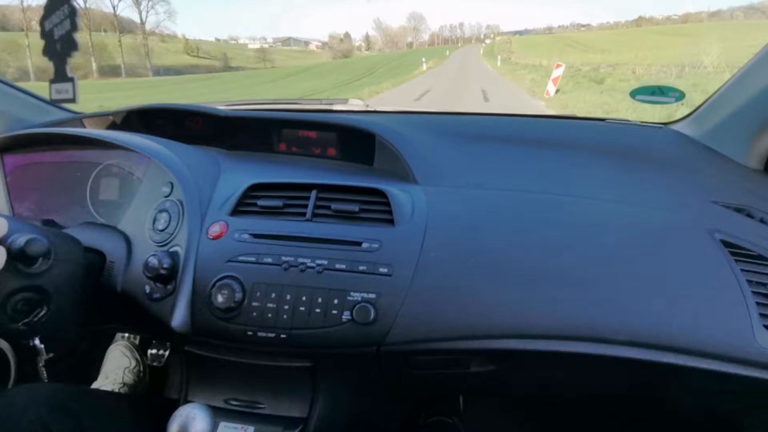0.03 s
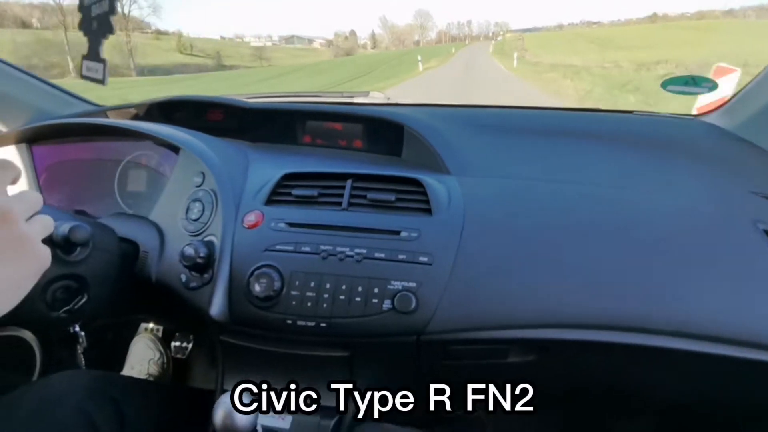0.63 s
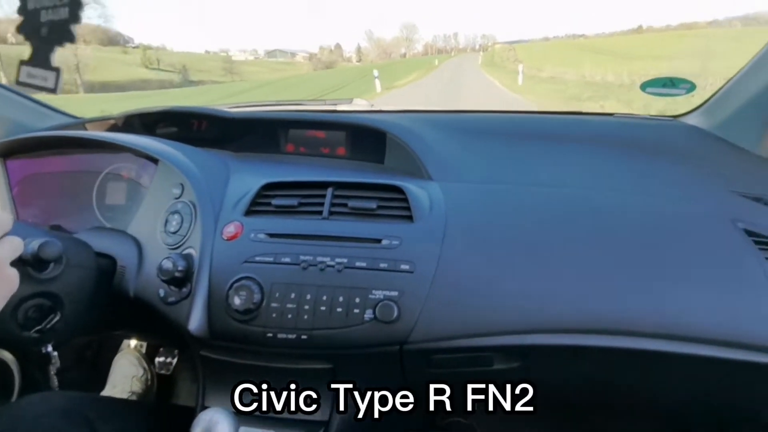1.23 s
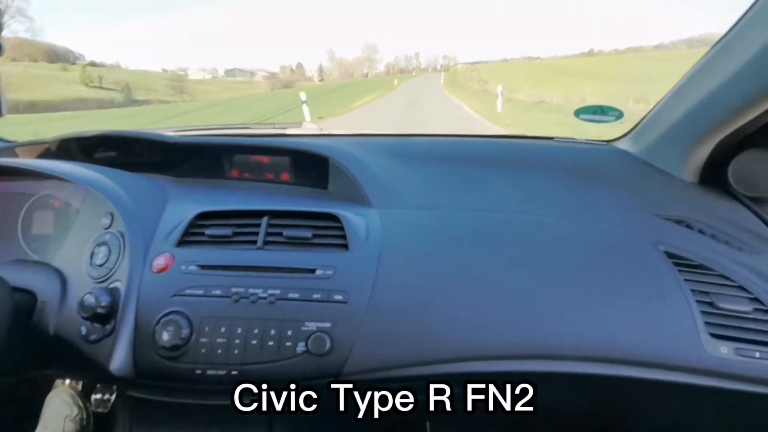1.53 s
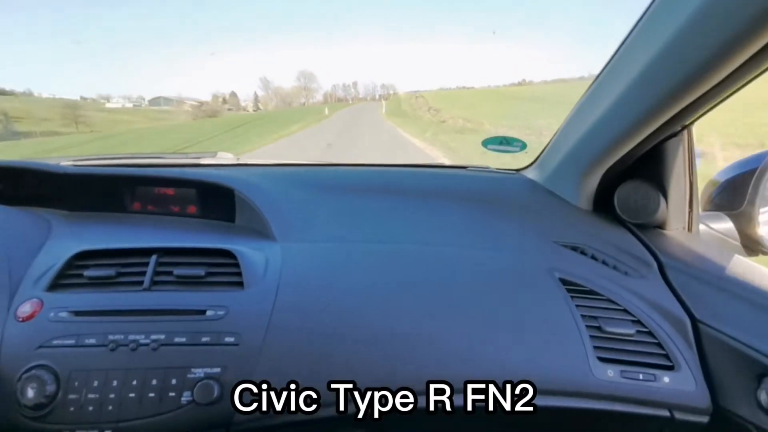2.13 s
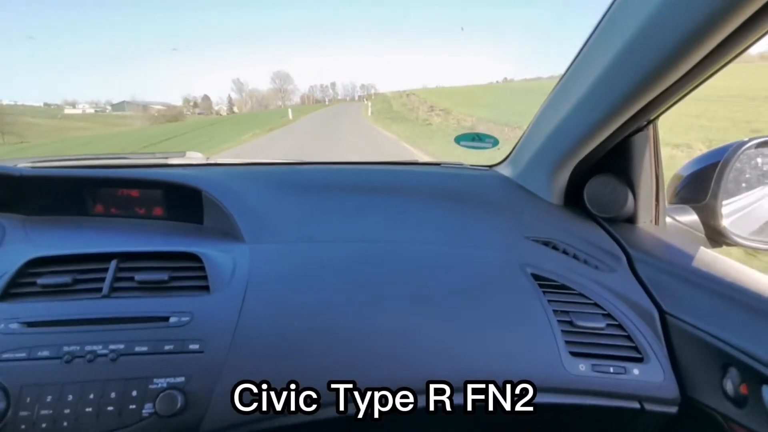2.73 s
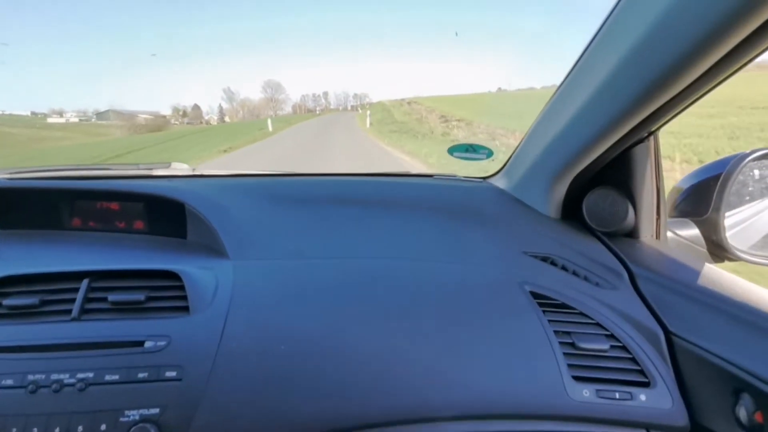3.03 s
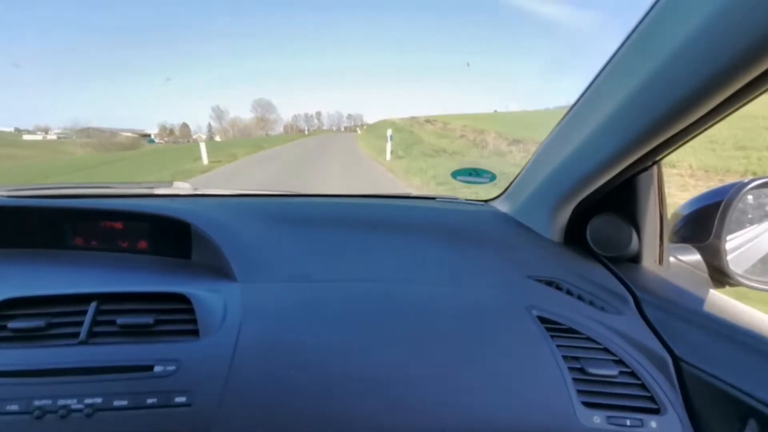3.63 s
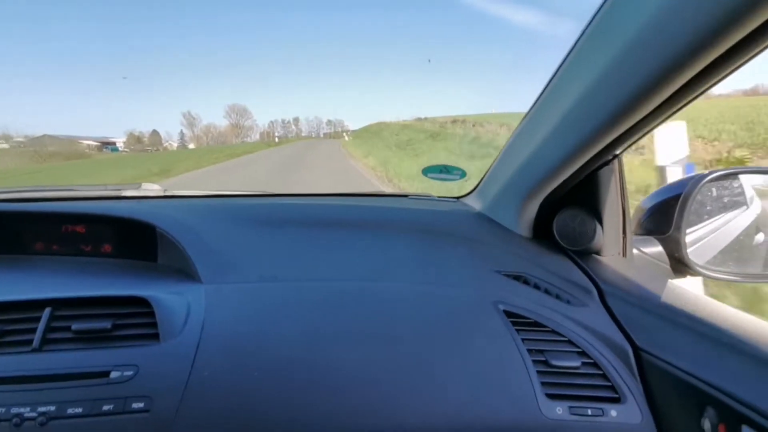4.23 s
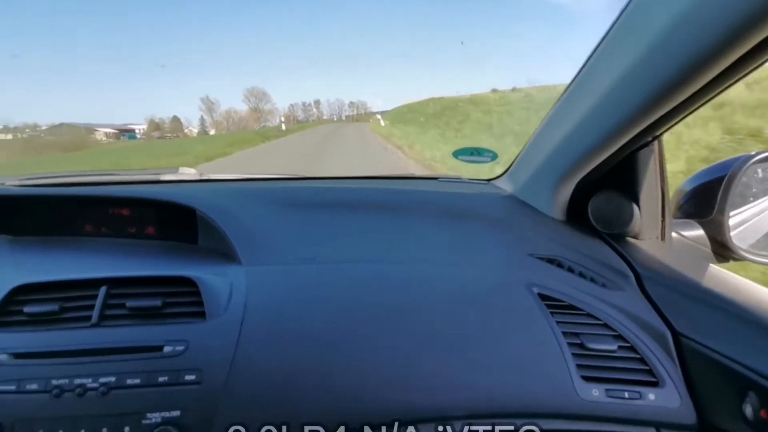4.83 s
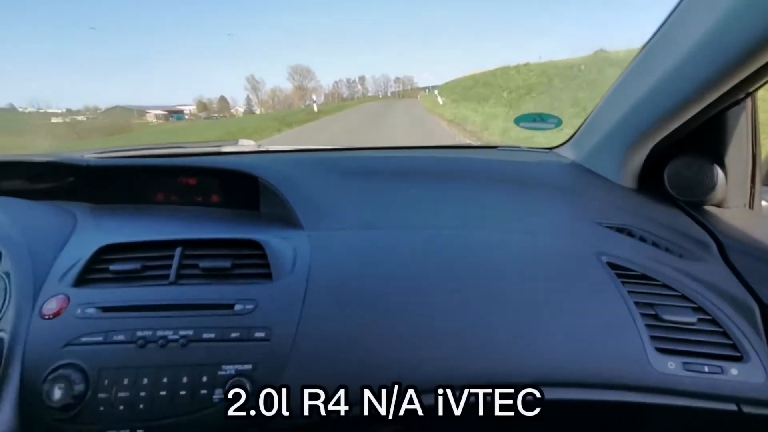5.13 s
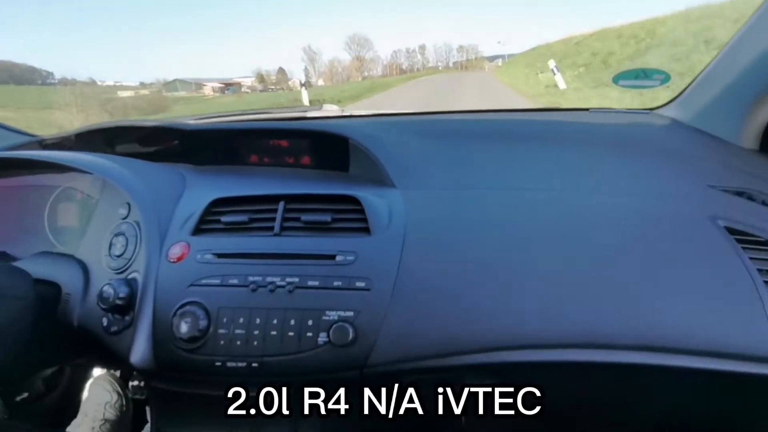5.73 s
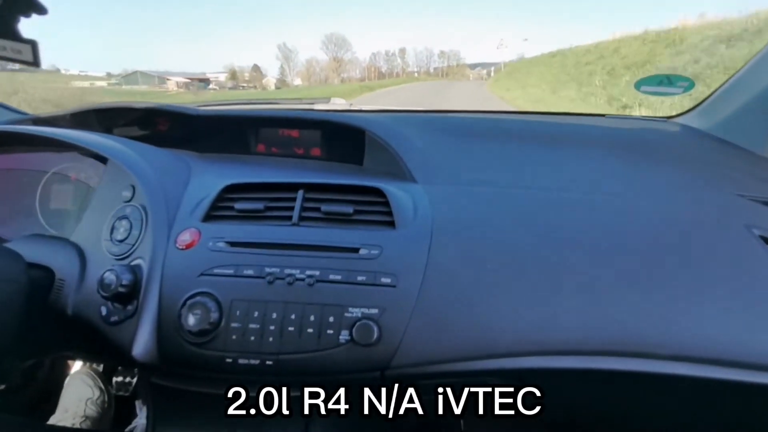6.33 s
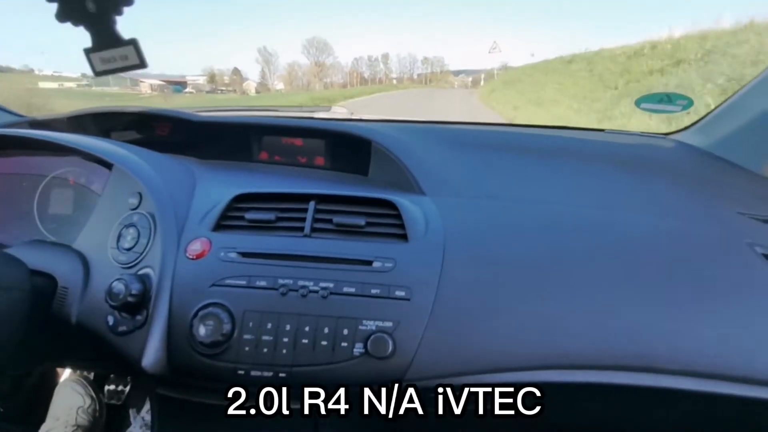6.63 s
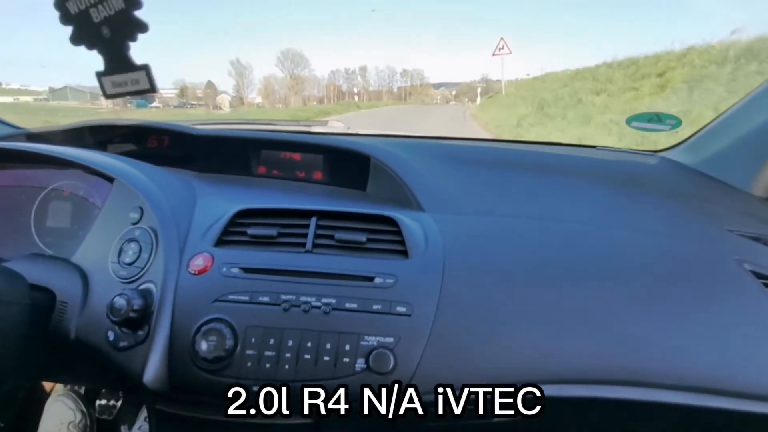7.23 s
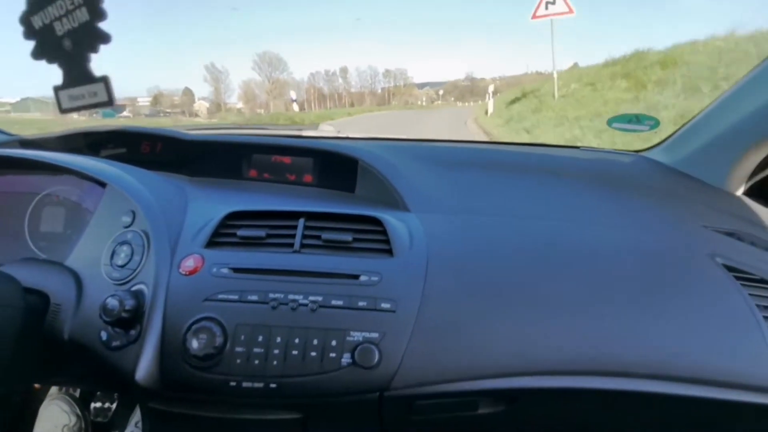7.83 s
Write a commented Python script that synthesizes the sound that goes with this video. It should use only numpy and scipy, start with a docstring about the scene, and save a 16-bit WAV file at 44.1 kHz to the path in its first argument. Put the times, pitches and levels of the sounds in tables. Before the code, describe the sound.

A car's booming exhaust drone heard from the cabin, accelerating briefly and then coasting down, with tyre roar and one sharp click.

```python
"""A four-cylinder exhaust drone, heard inside the car: it pulls up the revs, lifts off near 3 s and slows
in gear. Its partials boom as they sweep the cabin's standing waves; unequal cylinders add growl and a gear
whines faintly. Underneath, the body bounces and rumbles on a country road, tyres roar and wind hisses.
The sound starts abruptly, and one sharp click cuts through near 5.4 s."""
import sys
import numpy as np
from scipy import signal
from scipy.fft import irfft, next_fast_len
from scipy.io import wavfile
from scipy.ndimage import uniform_filter1d, minimum_filter1d

SR = 44100
rng = np.random.default_rng(int(sys.argv[2]) if len(sys.argv) > 2 else 0)


def to_wav(s):
    """Save 16-bit WAV."""
    ch = np.atleast_2d(s).T  # columns
    pcm = np.round(np.clip(ch, -1, 1) * 32767)  # PCM
    wavfile.write(sys.argv[1], SR, pcm.astype(np.int16))


N = 347508
TIME = np.arange(N) / SR

# engine speed: (time [s], firing rate [Hz])
REVS = [(0.28, 134.3), (0.5, 137.8), (1.5, 156.4), (2, 164.9), (2.7, 176.6), (2.9, 176.9), (3.2, 174.5),
        (3.5, 174.4), (3.9, 170.8), (4.2, 169), (5.15, 158.5), (6, 149.7), (6.3, 145.4), (6.9, 133.6),
        (7.2, 127.0), (7.5, 121.5), (7.85, 117.7)]
# accelerator: (time [s], load [0-1])
THROTTLE = [(.28, 0.66), (.7, 0.68), (.88, 0.96), (1.7, 0.87), (2.65, 0.75), (2.95, 0.21), (4, 0.23),
            (7.88, 0)]
# drone partials: (multiple of firing rate, full-load boost [dB], lift-off sag [dB], sag length [s])
DRONE_PARTIALS = [(1, -0.4, -8, .1), (2, 9, -1, 0.94), (3, 8.5, -13.5, 0.96)]
# cabin boom of a partial with no load: (frequency [Hz], level [dB])
CABIN_BOOM = [(118, -13.5), (124, -12.5), (137, -12.5), (145, -16), (152, -19), (156.5, -21), (161, -17),
              (168, -12.6), (174, -15.5), (178, -9), (237, -22.5), (260, -27), (290, -29.5), (329, -27.5),
              (342, -34), (355, -36), (375, -50), (420, -40), (442, -46.5), (465, -38), (488, -39.5),
              (507, -32), (522, -31), (531, -33.5)]
# standing waves at the ears: (frequency [Hz], left over right [dB], left phase lead [rad])
CABIN_STEREO = [(122, .5, 0), (140, .3, -.12), (158, -2, -.3), (176, -3.2, -.24), (240, 1, -.5),
                (264, 3, -1.4), (278, -3, -2.8), (294, -14, -.2), (312, -4, -.15), (335, 2.5, -.45),
                (352, -1, -1.8), (375, 4, .3), (415, -11, -1.3), (460, -7, -.5), (485, -1, -.7),
                (525, -3, -1.2), (560, -3, -.3), (700, 2, -.8), (1100, -3, -1.5)]
# weak engine orders: (multiple of firing rate, full-load level [dB], coasting level [dB])
GROWL_ORDERS = [(0.75, -37, -32.5), (1.25, -33.5, -42), (1.5, -42.5, -33.5), (1.75, -33.5, -49),
                (2.25, -39.5, -55.5), (2.5, -48, -46), (2.75, -42.5, -57), (3.25, -44.5, -60.5),
                (3.5, -48, -57.5), (3.75, -37.5, -64), (4.0, -38, -50), (4.25, -43.5, -63),
                (4.5, -52, -55.5), (4.75, -51.5, -62), (5.0, -44.5, -53.5), (5.25, -55.5, -63),
                (5.5, -56, -62.5), (5.75, -59, -65.5), (6.0, -43, -61), (6.5, -53.5, -66.5),
                (7.0, -51.5, -59)]
# resonances that colour the growl: (frequency [Hz], gain [dB])
GROWL_RESONANCES = [(120, -5), (180, -11.5), (200, -3), (215, 6), (228, 6), (255, -1), (330, -0.5),
                    (420, 0), (510, 4), (560, -0.5), (610, -3.5), (700, -1), (740, -4), (797, 5), (865, -3),
                    (937, 4), (1050, 3), (1100, 2.5)]
# gear whine envelope: (time [s], level [dB])
WHINE_ENVELOPE = [(.28, -74), (3.6, -73), (3.95, -61), (4.3, -68.5), (4.7, -62), (5.1, -71), (7.88, -85)]
# bumps that bounce the body: (time [s], level [dB])
ROAD_BUMPS = [(.85, -14.5), (1.16, -13.5), (1.8, -17), (2.45, -14.5), (2.82, -9.5), (3.5, -20), (3.72, -13),
              (4.06, -12), (5.08, -14), (5.3, -15), (5.64, -17.5), (6.74, -20)]
# coarseness of the asphalt: (time [s], rumble gain [dB], tyre roar gain [dB])
ROAD_TEXTURE = [(.4, -1, 0.3), (1.1, 0.5, -2), (1.8, -1.5, .5), (2.4, -1, 0.5), (2.9, 1, 0.5),
                (4.05, 1.8, -1), (4.5, 3, 1.5), (5.5, -0.5, .3), (6, 2.7, 1), (6.9, 1, -.3), (7.8, 1, 0.7)]
# colour of noise through the body: (frequency [Hz], left [dB], right [dB], stereo correlation)
BODY_COLOUR = [(10, -39.5, -41.5, 0.86), (18, -29, -32.5, 0.92), (25, -27.5, -29.5, 1),
               (38.5, -33.5, -36, 0.9), (54.7, -35.5, -36, 0.97), (73, -41.5, -43, 0.55),
               (109, -40.5, -44.5, 0.7), (128, -35.5, -38, 0.96), (211, -45.5, -42.5, 0.94),
               (262, -48.5, -49, 0.94), (304, -49.5, -50, 1), (410, -61.5, -61, 0.58),
               (600, -62.5, -61, 0.31)]
# colour of the tyre roar: (frequency [Hz], left [dB], right [dB], stereo correlation)
TYRE_COLOUR = [(360, -53.5, -57.5, 1), (435, -59, -60.5, 0.81), (510, -58.5, -65, 0.41),
               (570, -64, -64, 0.21), (650, -62.5, -63, 0.17), (700, -69, -64.5, -0.093),
               (790, -64.5, -61, 0.086), (873, -65, -69.5, 0.014), (946, -65, -58.5, 0.11),
               (1080, -65, -60.5, 0.088), (1200, -62.5, -59.5, -0.37), (1330, -65.5, -63, -0.3),
               (1640, -69.5, -64.5, -0.97)]
# colour of the wind: (frequency [Hz], left [dB], right [dB], stereo correlation)
WIND_COLOUR = [(1460, -66, -65, -0.35), (2000, -73.5, -68, -0.37), (2360, -75.5, -69, 0.094),
               (2920, -78.5, -69.5, -0.21), (3476, -84, -77, -0.13), (4350, -85, -81, 0.17),
               (5000, -89.5, -83, 0.021), (5550, -91.5, -90.5, -0.04), (7500, -95.5, -90, 0.09),
               (8500, -96, -95.5, 0.18), (9100, -93.5, -104.2, 0.03), (10700, -97, -103.5, 0.03),
               (12000, -100.4, -105.4, -0.02), (15000, -110.1, -111.5, 0.09)]
# gusts riding on the wind: (time [s], gain [dB])
GUSTS = [(.5, 0), (1.7, -2), (2.4, -.5), (3.2, 1), (4.1, -.5), (4.7, .8), (6.4, 0.65), (7.8, 0.9)]


def exhaust_drone(phase, firing_hz, load, lift_s=2.98, fall_s=0.079, waver_db=0.5):
    """Three partials sweep the cabin's booms; the exhaust goes slack on lift-off, then recovers."""
    drone, since_lift = 0, TIME - lift_s
    for order, load_db, sag_db, sag_s in DRONE_PARTIALS:
        boom_db, = at_hz(CABIN_BOOM, order * firing_hz)
        slack = np.exp(-np.where(since_lift < 0, (since_lift / fall_s) ** 2, (since_lift / sag_s) ** 8))
        level_db = boom_db + load * load_db + slack * sag_db + waver_db * drift(3)
        drone += cabin_tone(order * phase + rng.uniform(0, 2 * np.pi), order * firing_hz, level_db)
    return drone


def cylinder_growl(phase, firing_hz, load, jitter_rad=0.26, rough_db=2.5, trim_db=-0.05):
    """No two cylinders fire alike: restless tones fill the gaps, shaped by load and resonances."""
    growl = 0
    for order, pulling_db, coasting_db in GROWL_ORDERS:
        resonance_db, = at_hz(GROWL_RESONANCES, order * firing_hz)
        drive_db = coasting_db + load * (pulling_db - coasting_db)
        level_db = drive_db + resonance_db + trim_db + rough_db * drift(8)
        shaky_phase = order * phase + rng.uniform(0, 2 * np.pi) + jitter_rad * drift(13)
        growl += cabin_tone(shaky_phase, order * firing_hz, level_db)
    return growl


def cabin_tone(phase, hz, level_db):
    """Standing waves give an engine partial its own level and phase at each ear."""
    balance_db, lead = at_hz(CABIN_STEREO, hz)
    left, right = from_db(balance_db / 2), from_db(-balance_db / 2)
    gain = 2 * from_db(level_db) / np.hypot(left, right)
    return gain * np.array([left * np.sin(phase + lead / 2), right * np.sin(phase - lead / 2)])


def gear_whine(phase, order=32, jitter_rad=0.98, flicker_db=1.0):
    """A gear on the engine sings thinly, fading in and out on the overrun."""
    level_db = in_time(WHINE_ENVELOPE)[0] + flicker_db * drift(5)
    smear = jitter_rad * np.array([drift(25), drift(25)])
    return from_db(level_db) * np.sqrt(2) * np.sin(order * phase + smear)


def click(at_s=5.4233, peak_db=-8.3, decay_s=0.0007):
    """A sudden pressure step that dies at once, dead centre."""
    age = TIME - at_s
    return -from_db(peak_db) * (age >= 0) * np.exp(-np.abs(age) / decay_s)


def body_bounce(firing_hz, mode_hz=26, wander_rad=1.3, swing_db=2.5, rise_s=0.055, decay_s=0.1):
    """Sub-bass: the body shakes at its lowest mode, and each bump swells it briefly."""
    power = (speed_gain(firing_hz, -21, 4.2) * from_db(swing_db * drift(3))) ** 2
    for at_s, bump_db in ROAD_BUMPS:
        age = TIME - at_s
        swell = np.exp(-(age / np.where(age < 0, rise_s, decay_s)) ** 2)
        power += (from_db(bump_db) * swell) ** 2
    return np.sqrt(2 * power) * np.sin(2 * np.pi * mode_hz * TIME + wander_rad * drift(4))


def body_rumble(firing_hz, uneven_db=1.2):
    """Wheels rumble through the springs in mono; stirred air buffets the ears in antiphase."""
    wheels = speed_gain(firing_hz, -21.5, 10) * noise_band(BODY_COLOUR, 39, 100).mean(axis=0)
    buffet = speed_gain(firing_hz, -31.5, 13) * noise_band(BODY_COLOUR, 15, 100).mean(axis=0)
    texture_db = in_time(ROAD_TEXTURE)[0] + uneven_db * drift(2.3)
    return (wheels + buffet * np.array([[1], [-1]])) * from_db(texture_db)


def floor_drum(firing_hz, evenness=0.59):
    """The tread drums on the floor panels, levelled to a steady low rumble."""
    drum = noise_band(BODY_COLOUR, 100, 380)
    power = uniform_filter1d(drum.mean(axis=0) ** 2, SR // 16)
    return speed_gain(firing_hz, -21.5, 12.4) * drum / power ** (evenness / 2)


def tyre_roar(firing_hz, patchy_db=0.57):
    """Three bands of roar grow with speed and swell with patches of asphalt."""
    low = speed_gain(firing_hz, -38, 7) * noise_band(TYRE_COLOUR, 380, 640)
    middle = speed_gain(firing_hz, -40.5, 28) * noise_band(TYRE_COLOUR, 640, 900)
    high = speed_gain(firing_hz, -39, 12.6) * noise_band(TYRE_COLOUR, 900, 1500)
    return (low + middle + high) * from_db(in_time(ROAD_TEXTURE)[1] + patchy_db * drift(5.8))


def wind(firing_hz):
    """Air over the body: a rush topped with hiss, riding on speed and gusts."""
    rush = speed_gain(firing_hz, -40, 19.5) * noise_band(WIND_COLOUR, 1524, 5000)
    hiss = speed_gain(firing_hz, -54.5, 23) * noise_band(WIND_COLOUR, 4980, 16000)
    return (rush + hiss) * from_db(in_time(GUSTS)[0])


def intake_throb(phase, load, depth=0.066, flutter_db=0.5):
    """A lightly fluttering gain: under load the intake air throbs with the firings."""
    return from_db(flutter_db * drift(28)) * (1 + depth * load * np.cos(phase))


def speed_gain(firing_hz, cruise_db, db_per_doubling, cruise_hz=170):
    """Fader for a rolling sound: in one gear, road speed follows the firing rate."""
    return from_db(cruise_db + db_per_doubling * np.log2(firing_hz / cruise_hz))


def noise_band(colour, low_hz, high_hz):
    """A noise band with a table's colour and stereo width, scaled so its mid has rms 1."""
    size = next_fast_len(N, True)
    hz = np.arange(1, size // 2 + 1) * SR / size
    hz = hz[hz < 2 * high_hz]
    left_db, right_db, correlation = at_hz(colour, hz)
    correlation = np.clip(correlation, -.99, .99)
    bandpass = ((1 + (low_hz / hz) ** 12) * (1 + (hz / high_hz) ** 12)) ** -.5
    mid, side = rng.standard_normal((2, len(hz))) + 1j * rng.standard_normal((2, len(hz)))
    ears = np.sqrt(1 + correlation) * mid + np.sqrt(1 - correlation) * side * [[1], [-1]]
    band = irfft(ears * bandpass * from_db([left_db, right_db]), size)[:, :N]
    return band / band.mean(axis=0).std()


def drift(rate_hz):
    """Smooth random modulation with a standard deviation of 1."""
    hop, warmup = 40, 2000
    pole = np.exp(-2 * np.pi * rate_hz * hop / SR)
    white = rng.standard_normal(N // hop + warmup + 2)
    slow = signal.lfilter([1], [1, -2 * pole, pole * pole], white)[warmup:]
    return np.interp(np.arange(N) / hop, np.arange(len(slow)), slow / slow.std())


def from_db(db):
    """Decibels to gain."""
    return 10 ** (np.asarray(db) / 20)


def in_time(rows):
    """A table's automation curves at every sample."""
    times, *columns = np.transpose(rows)
    return [np.interp(TIME, times, column) for column in columns]


def at_hz(rows, hz):
    """A table's spectral curves at these frequencies."""
    points, *columns = np.transpose(rows)
    return [np.interp(np.log(hz + 1e-9), np.log(points), column) for column in columns]


def scene(start_s=0.2775, attack_s=0.00014, swell_from_db=-5, swell_s=0.21):
    """Revs and load drive the engine, road and wind follow its speed; the mix cuts in, then swells."""
    firing_hz, = in_time(REVS)
    load, = in_time(THROTTLE)
    phase = 2 * np.pi * np.cumsum(firing_hz) / SR
    engine = exhaust_drone(phase, firing_hz, load) + cylinder_growl(phase, firing_hz, load)
    engine += gear_whine(phase)
    body = body_bounce(firing_hz) + body_rumble(firing_hz) + floor_drum(firing_hz)
    rush = (tyre_roar(firing_hz) + wind(firing_hz)) * intake_throb(phase, load)
    age = TIME - start_s
    attack = np.clip(age / attack_s, 0, 1)
    swell = from_db(swell_from_db * np.clip(1 - age / swell_s, 0, 1))
    return (engine + click() + body + rush) * attack * swell


def record(dry, ceiling=0.92, cutoff_hz=15400):
    """A limiter eases the highest peaks, and a steep low-pass trims the top."""
    hold = SR // 50
    headroom = np.minimum(1, ceiling / (np.abs(dry).max(axis=0) + 1e-9))
    gain = uniform_filter1d(minimum_filter1d(headroom, hold), hold)
    lowpass = signal.ellip(10, .1, 80, cutoff_hz, fs=SR, output="sos")
    return signal.sosfilt(lowpass, dry * gain)


dry = scene()
out = record(dry)
to_wav(out)
```